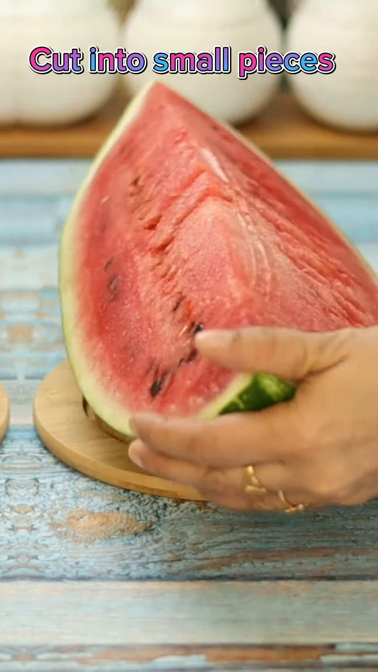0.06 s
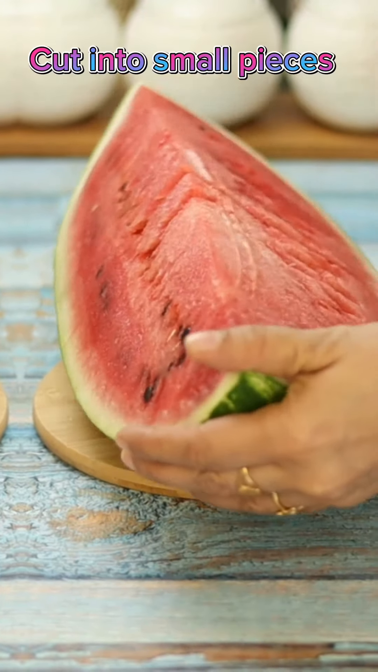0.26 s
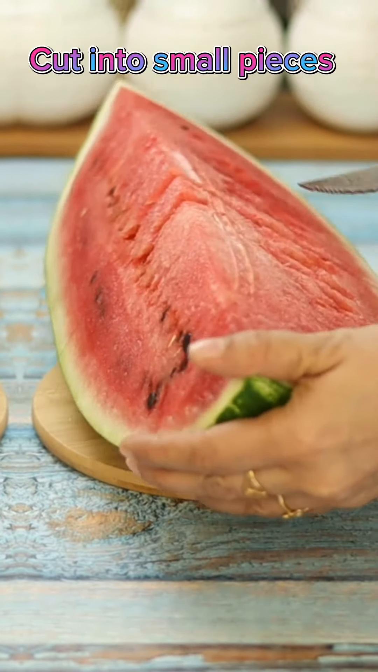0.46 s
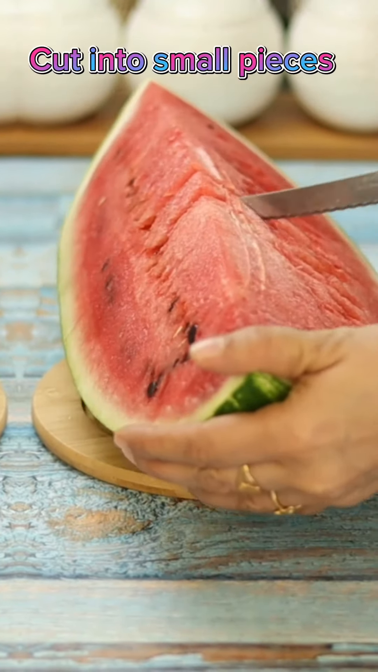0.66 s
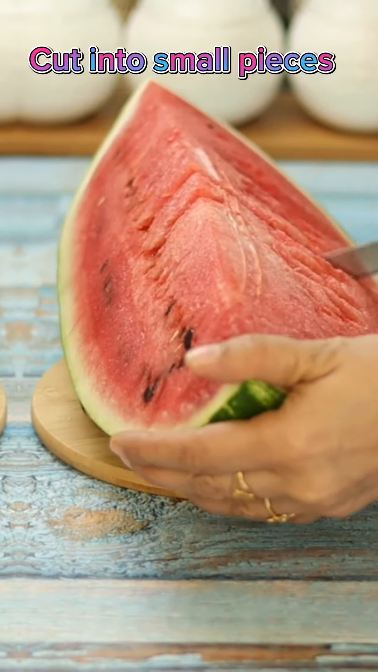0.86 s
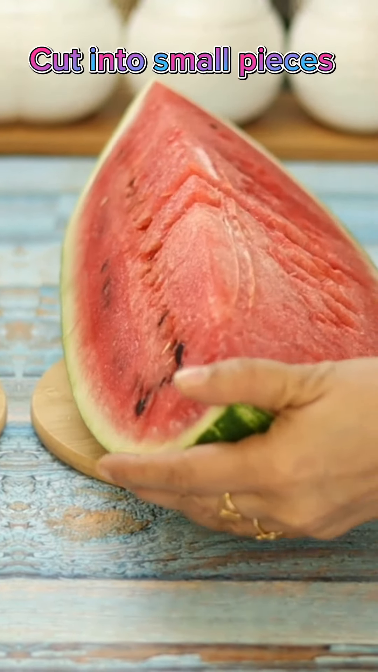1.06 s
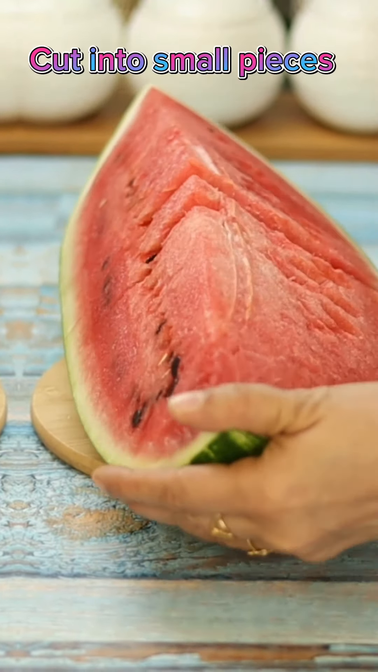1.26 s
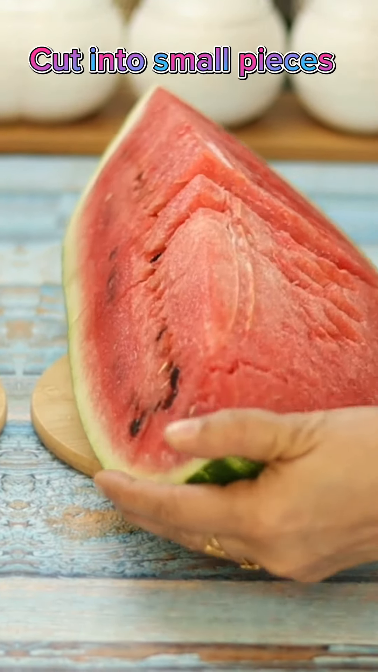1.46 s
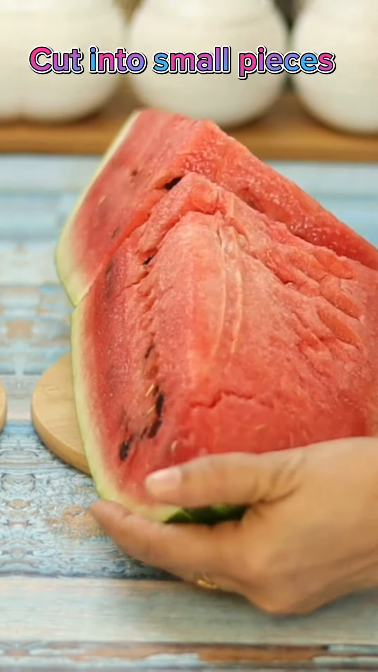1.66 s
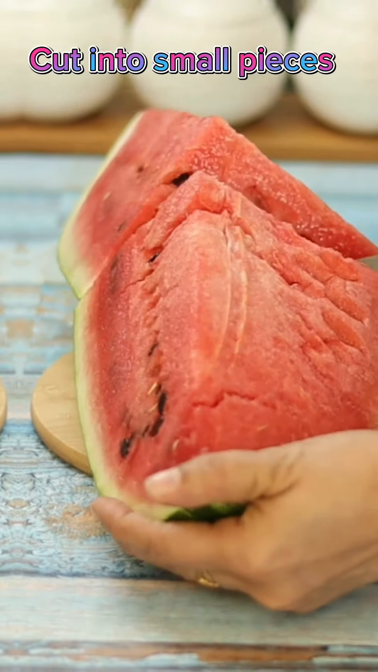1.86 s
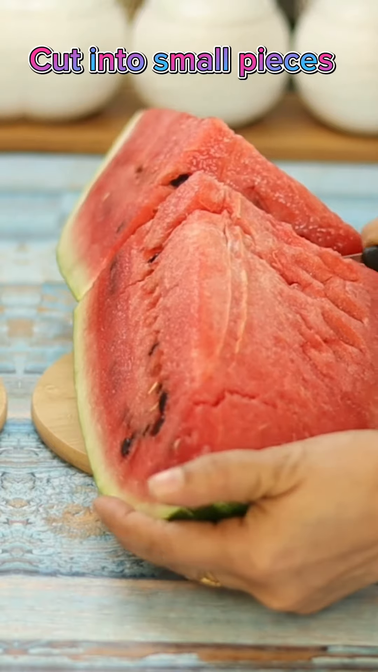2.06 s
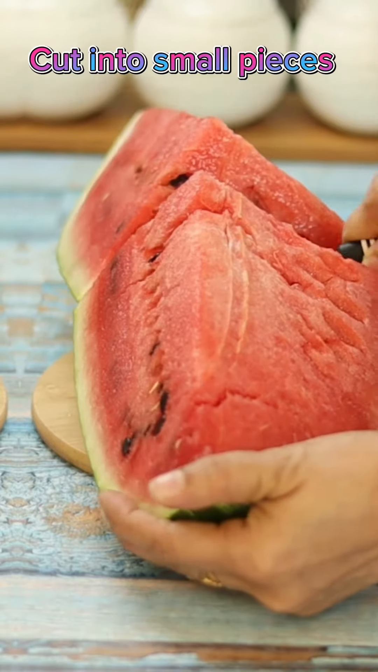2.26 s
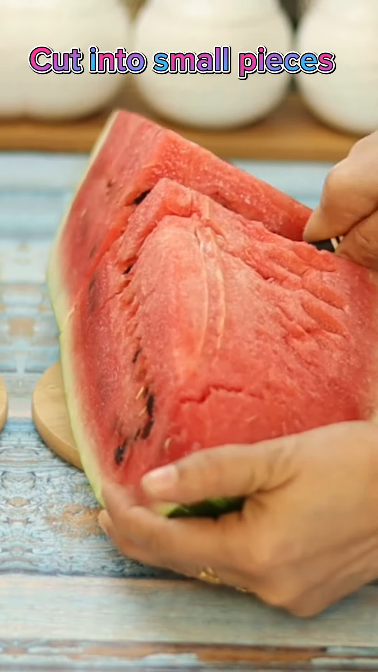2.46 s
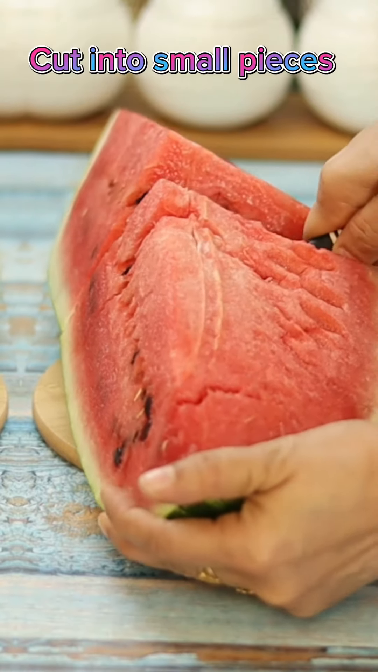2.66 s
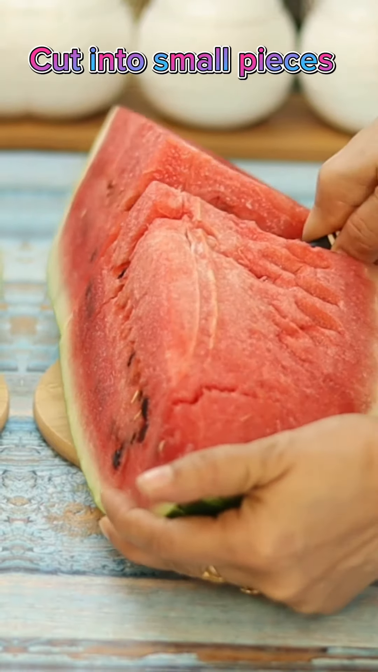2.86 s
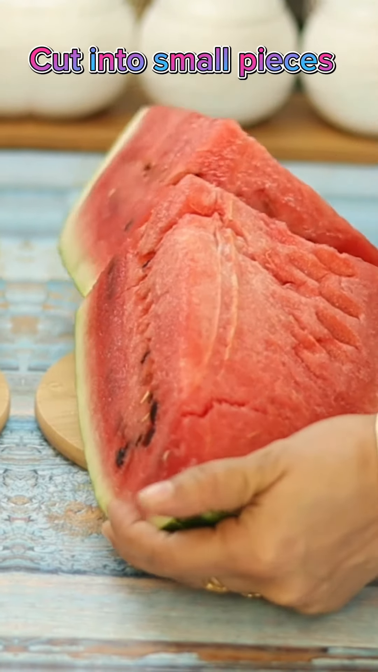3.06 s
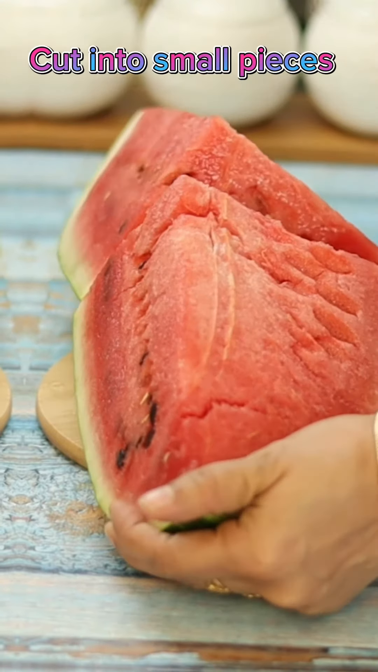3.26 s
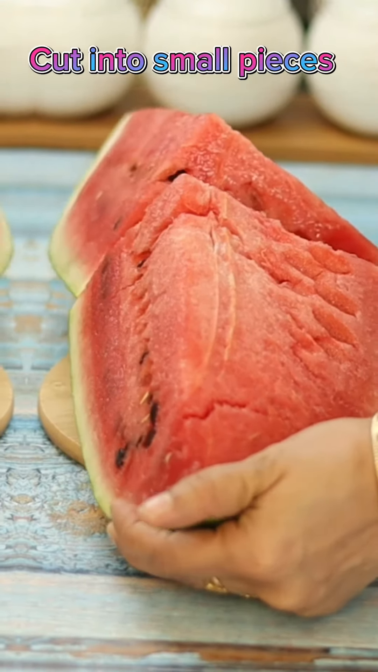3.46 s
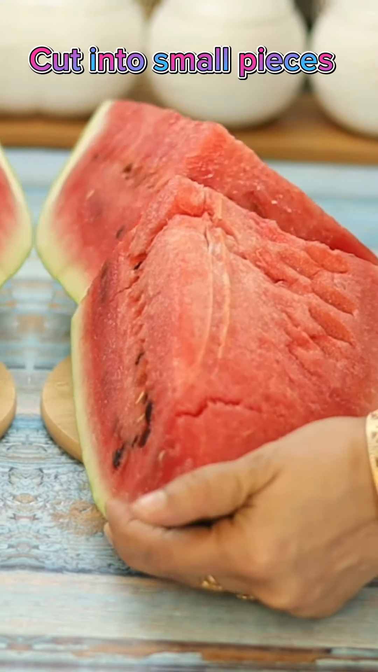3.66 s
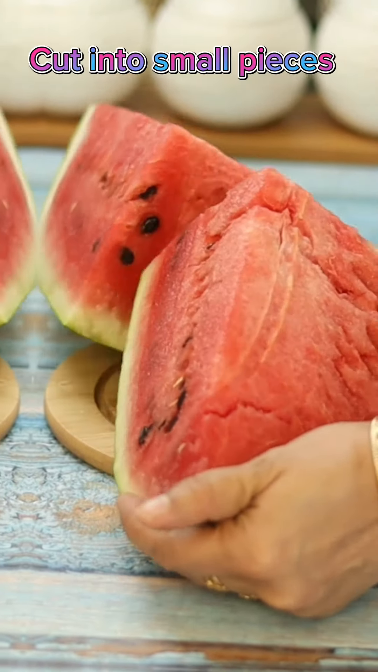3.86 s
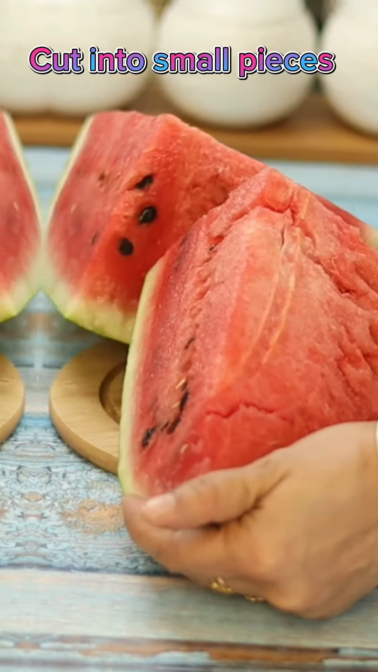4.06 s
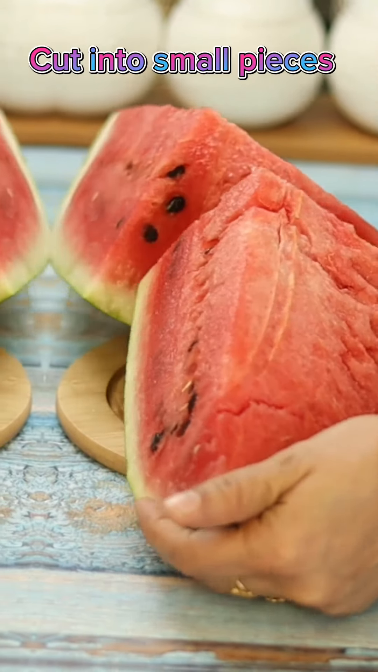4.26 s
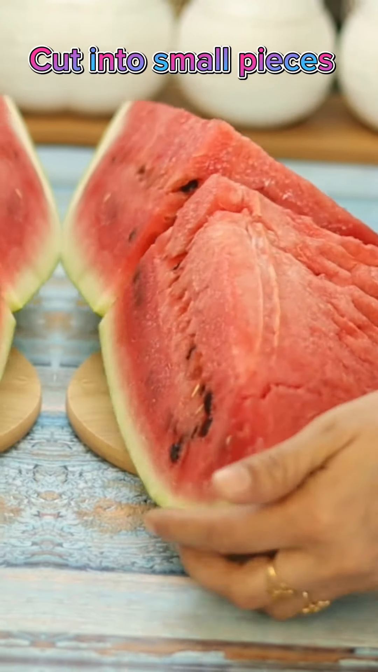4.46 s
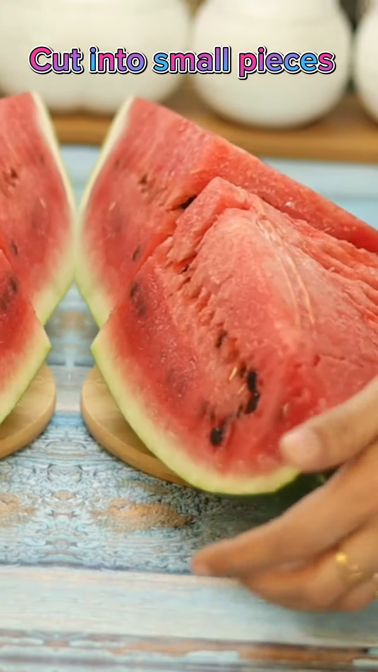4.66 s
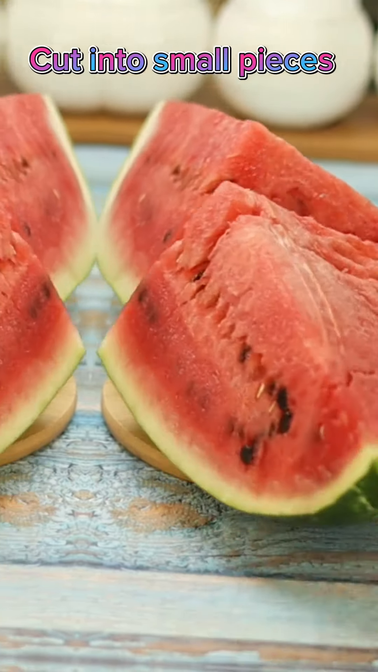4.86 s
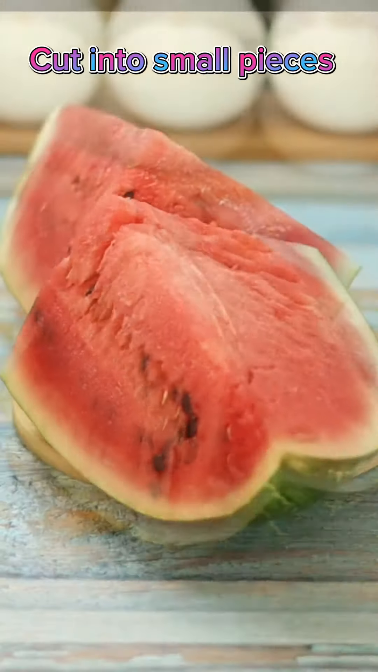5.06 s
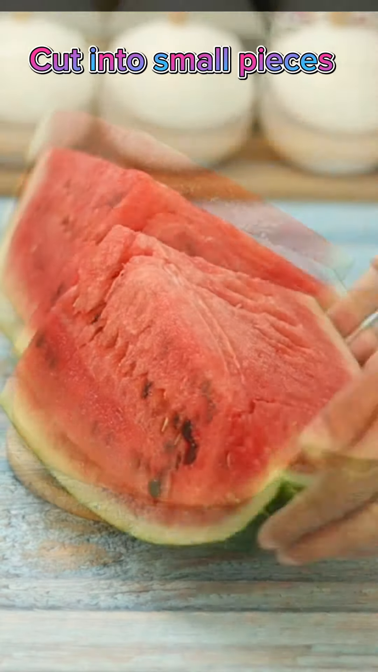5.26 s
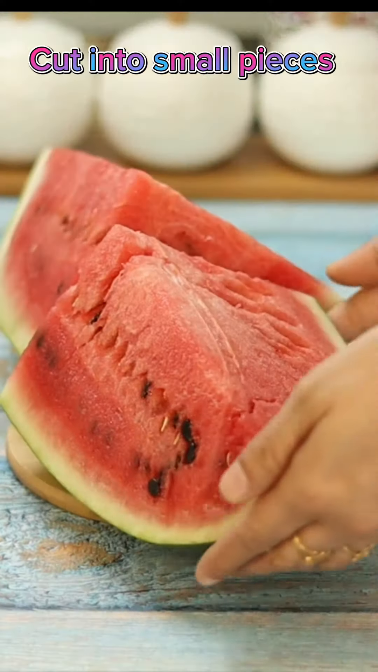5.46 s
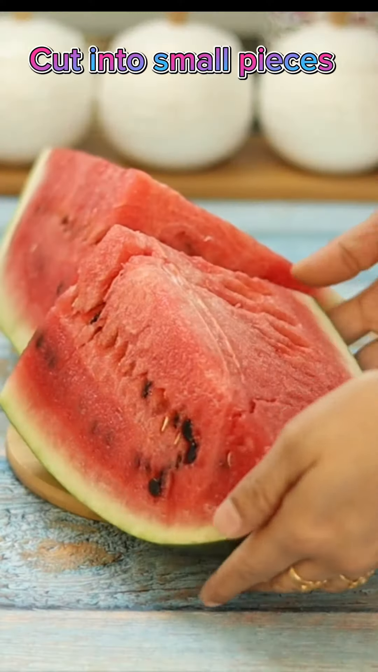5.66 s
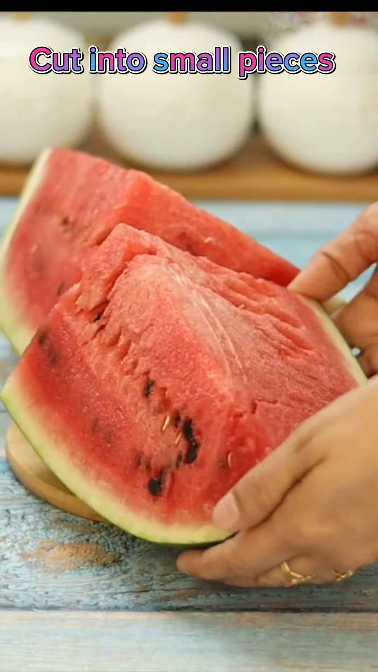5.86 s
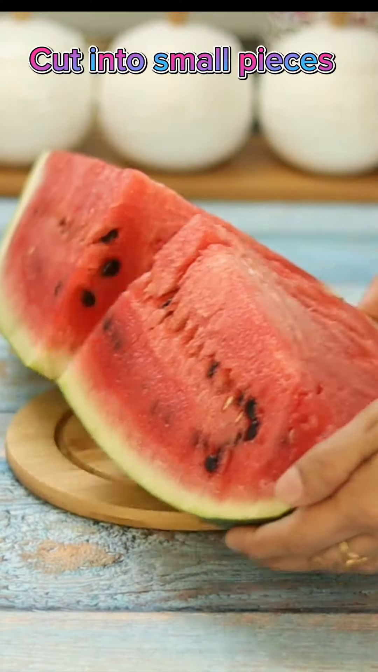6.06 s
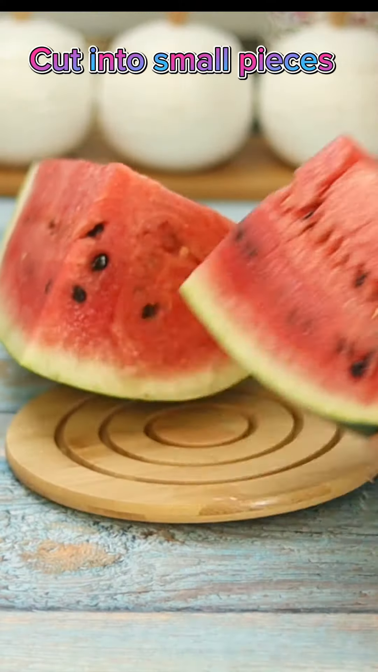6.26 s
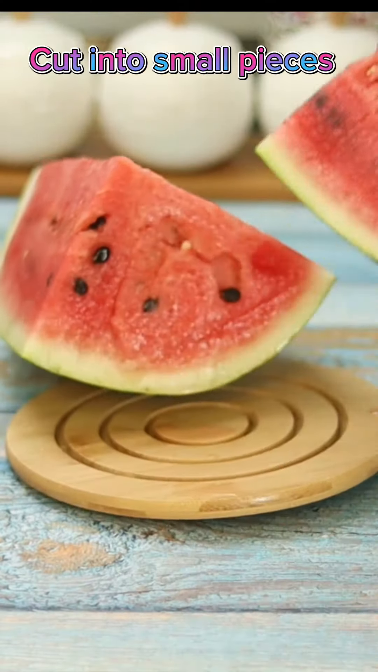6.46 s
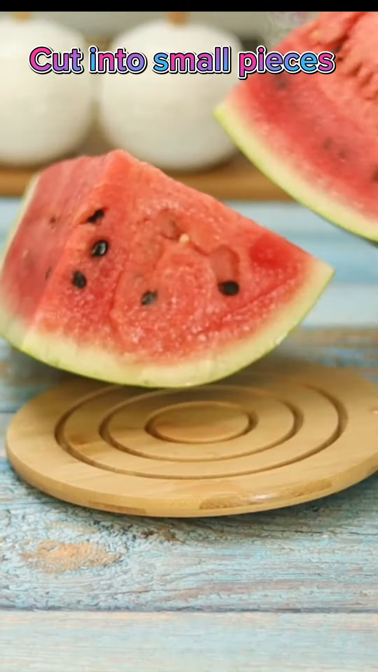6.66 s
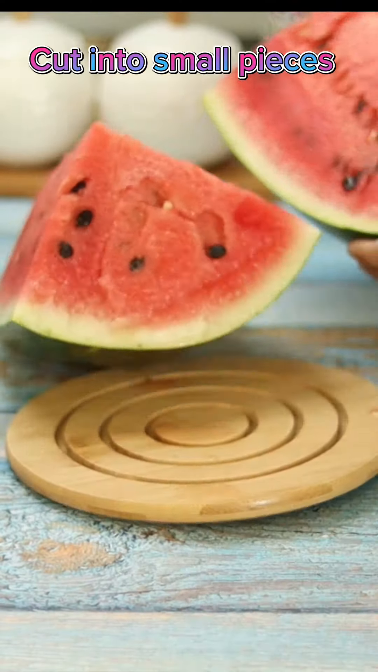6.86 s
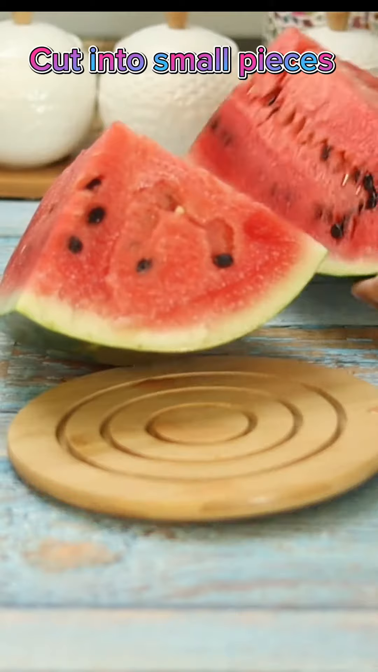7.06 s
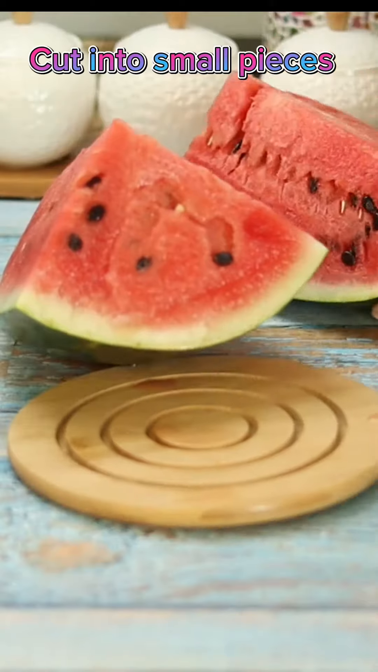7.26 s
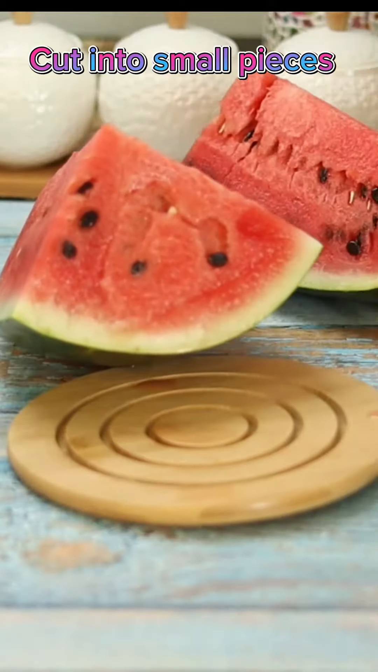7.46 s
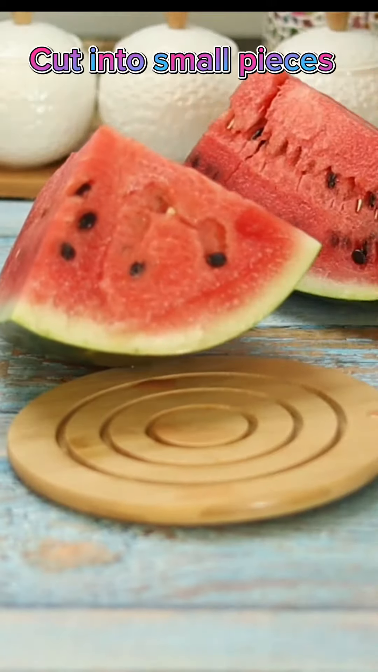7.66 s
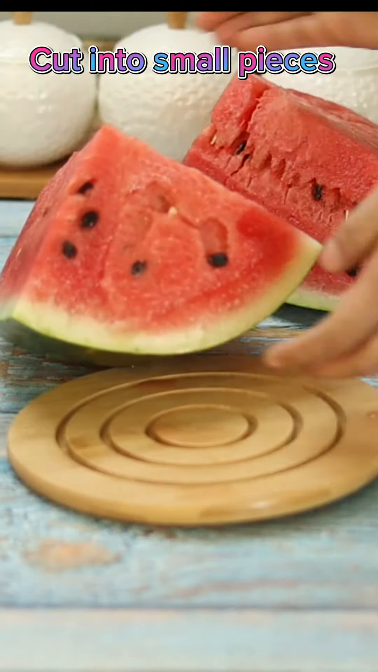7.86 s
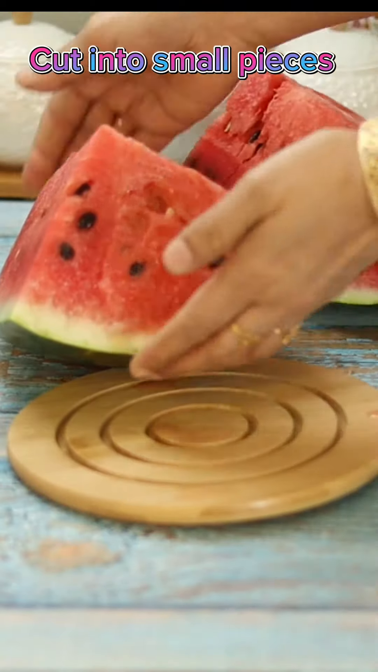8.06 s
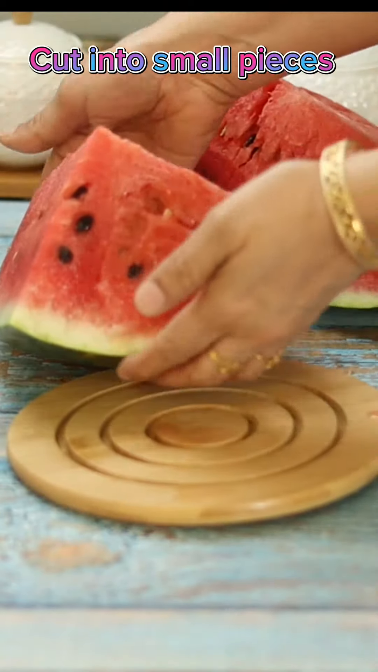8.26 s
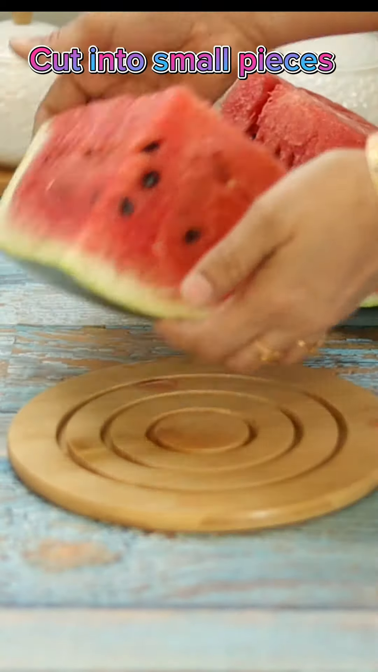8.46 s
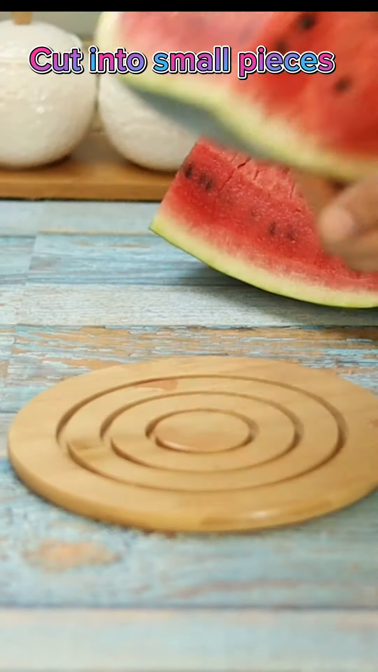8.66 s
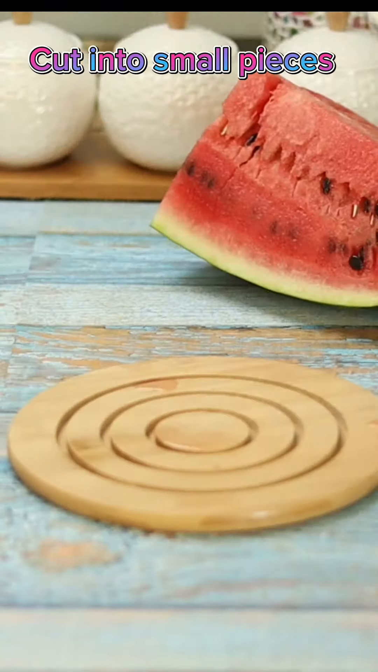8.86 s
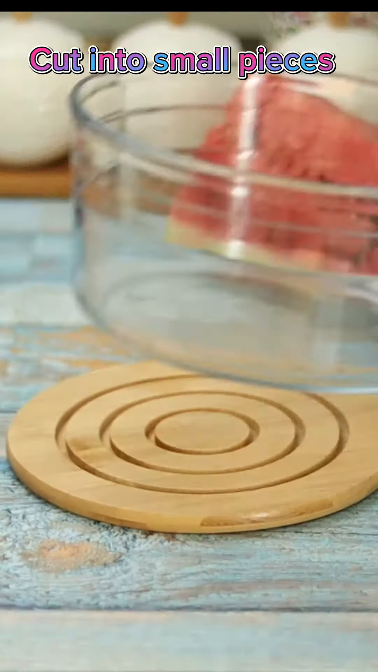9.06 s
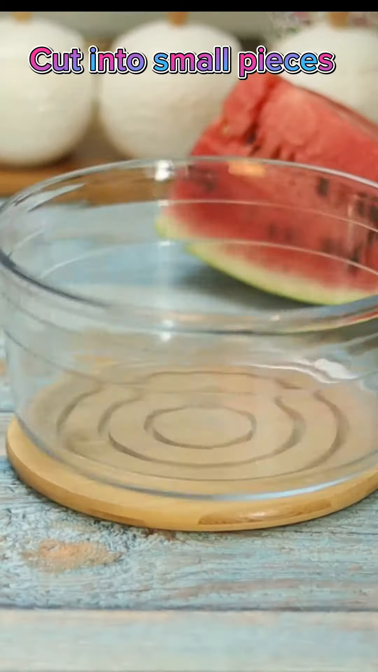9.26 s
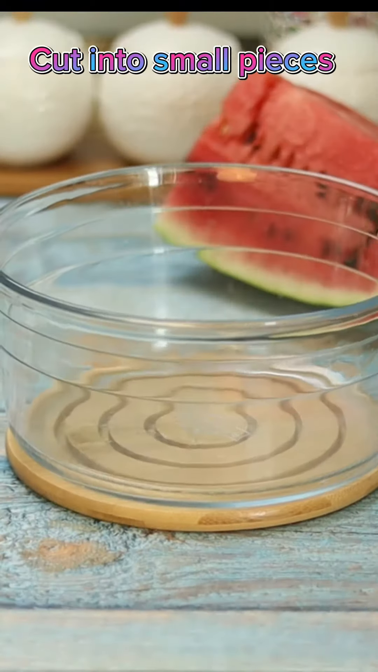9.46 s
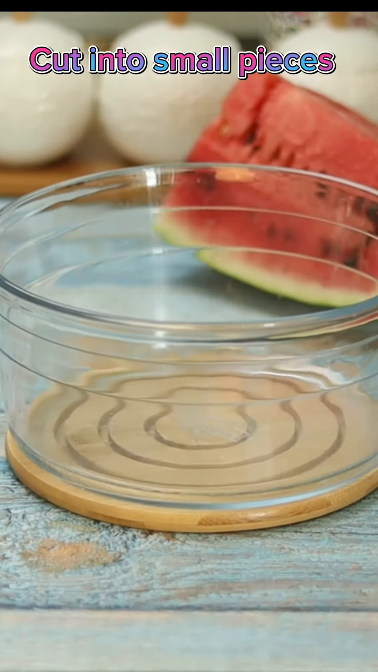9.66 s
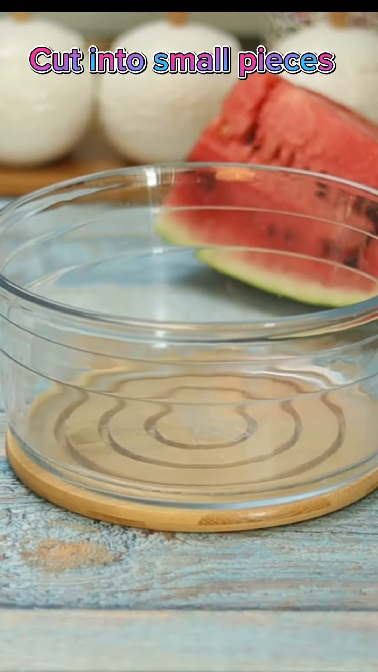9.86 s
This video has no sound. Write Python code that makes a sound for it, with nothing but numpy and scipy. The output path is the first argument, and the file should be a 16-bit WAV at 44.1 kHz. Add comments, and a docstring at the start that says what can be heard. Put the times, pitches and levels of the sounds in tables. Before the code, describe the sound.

A close microphone in a hard-walled kitchen, with a low 100-hertz appliance hum and airy rush from the start. Almost immediately, at 0.05 s, a very loud, wet crack splits the melon with a dull bump. Soft skin rubbing follows around 1 s, then a burst of crisp cracks and juicy crunches from 1.3 to 1.7 s. Quiet shifting and a brief low, rough judder come near 2.7 s, a short crack at 3.0, and a crunch with a hard blade-on-board knock at 3.8. Faint handling continues. At 5.4 s the hum cuts off, leaving fainter hum and room tone. Heavy pieces thud and scrape dully on wood at 7.0 and 7.25 s, with a softer bump at 8.4. A barely audible distant whistle glides upward around 8.6 to 9.2 s. At 9.27 s a thick glass bowl clunks onto the board, rattles briefly, and settles with a softer touch at 9.4.

```python
"""A knife splits a wedge of melon on a wooden board in a hard-walled kitchen: short rings make the rind's
cracks, clumped grains in broad resonances the crunch of flesh and the hands rubbing the skin. An appliance,
sines and coloured noise, hums from the start and falls silent midway; a fainter hum and room tone remain.
Pieces thud down and shift on damped wood modes; gliding sines make low rough judders, later a faint far
whistle. Near the end a glass bowl lands and rocks, in short modes. Echoes and a tail follow near sounds."""
import sys
import numpy as np
from scipy import signal
from scipy.fft import rfft, irfft
from scipy.io import wavfile
from scipy.ndimage import uniform_filter1d

SR = 44100
rng = np.random.default_rng(int(sys.argv[2]) if len(sys.argv) > 2 else 0)


def to_wav(sig):
    """Store sig (one row per channel, or 1-D mono) as 16-bit WAV at the path in sys.argv[1].

    Samples outside -1..1 are clipped; the rate is SR.
    """
    pcm = np.clip(np.atleast_2d(sig), -1, 1) * 32767
    pcm = np.round(pcm).astype(np.int16)
    wavfile.write(sys.argv[1], SR, pcm.T)  # frames by channels


def voltage_ratio(level):
    """Linear amplitude factor for a level in decibels (scalar or array-like)."""
    return 10 ** (np.asarray(level, float) / 20)


N = 437031
TIME = np.arange(N) / SR

# Rind cracks and small ticks; the rows at 0.051 and 3.783 s are strong early echoes of the cracks just before
# them. Each row: start in seconds, level in dB, pitch in Hz, snap against the ring in dB, left over right in
# dB.
CRACKS = [(0.044, 1, 1820, -26, 5.5), (0.046, -10, 3900, -24.5, 0), (0.051, -12.5, 1770, -12.5, -12),
          (0.364, -38, 1510, -2.5, -1.5), (0.731, -47.5, 1120, 3, 1), (0.931, -35, 3630, -20, -1.0),
          (0.959, -23, 1900, -13.5, -2.5), (1.107, -28.5, 2730, -26, -1.0), (1.264, -20.5, 2160, -12, -2.5),
          (1.307, -9, 3110, -23, -5.5), (1.329, -8.5, 2660, -13, -4), (1.365, -12.5, 1540, -13, 3),
          (1.496, -22, 3230, -5, -3), (1.501, -5.5, 2300, -26, -3), (1.537, -2.5, 2260, -25.5, -2.0),
          (1.571, -5, 2590, -18, -5), (1.694, -18.5, 3700, -1.5, 1), (3.009, -11, 1820, -16, -4.5),
          (3.667, -14, 2240, -12, -3), (3.74, -17, 2070, -11, 2), (3.776, -4, 1930, -3, -4.5),
          (3.783, -13.5, 1230, -11, 1), (4.446, -33.5, 5600, -33, 5), (4.636, -38.5, 3460, -14, -3),
          (6.132, -34.5, 2490, -2.5, -4.5), (6.98, -21.5, 1283, -21.5, -2), (7.259, -14.5, 1364, -23, -4),
          (7.3, -26, 2300, -18, -2), (7.46, -34.5, 2200, -30, -1), (7.515, -33.5, 2100, -31, 2),
          (7.558, -32.5, 2195, -31, -1.5), (7.844, -45.5, 1450, 3.5, 1), (8.591, -35, 1244, -23.5, -2),
          (9.109, -40, 2150, -17, 6)]
RING_T60_S, RING_DB_PER_DB = 0.0064, .1   # ring of a 0 dB crack; its lengthening with crack level

# Blade driven through flesh. Each row: start in seconds, hold in seconds, fall in seconds per 30 dB,
# flesh level in dB, brightness in dB per band.
CUTS = [(0.049, 0.0055, 0.0348, -13, -10.5), (0.097, 0.0054, 0.17, -30.5, -16.5),
        (1.111, 0.076, 0.17, -51, 0.5), (1.307, 0.041, 0.1237, -29.5, -3.5), (1.504, .085, 0.1141, -27, -3),
        (1.69, .005, 0.14, -38, 1), (3.011, 0.008, 0.0229, -26, -6.5), (3.04, 0.065, 0.2, -46, -0.5),
        (3.667, 0.085, 0.0446, -39.5, -2), (3.781, 0.0048, 0.03, -22.5, 0.5), (3.81, .01, 0.1747, -37, -3),
        (6.134, .003, .05, -48, -1.5), (6.982, .02, 0.3, -50, -9), (7.26, 0.014, .21, -32, -9),
        (8.389, 0.0039, 0.06, -61.5, -1)]
CUT_RISE_S_PER_30DB, CUT_FACE_DB = 0.0071, -2   # cut face against the even slope

# Hands and blade rubbing the skin. Each row: peak in seconds, rise and fall in seconds per 30 dB
# (1 ms at least), levels of flesh, cut face and juice in dB.
RUBS = [(0.037, 0.7, -0.0049, -30, -31.5, -32.5), (0.372, 0.6, 0.4, -61.5, -61, -63.5),
        (0.91, 0.7, .3, -59, -59.5, -54.5), (0.966, 0.13, 0.14, -37.5, -46.5, -50.5),
        (1.295, 0.37, 0.23, -47, -40, -48), (1.49, 0.13, 0.26, -45, -43.5, -57),
        (2.074, .1, 0.13, -55, -63.5, -60), (2.257, 0.22, 0.97, -60, -56.5, -55),
        (2.782, 0.1, 0.67, -62.5, -63, -62.5), (3.4, -0.4, 0.2, -62.5, -65, -65),
        (3.66, 0.08, -0.1, -55.5, -55, -51), (3.772, 0.1, -0.01, -35.5, -36, -37.5),
        (4.43, 0.7, 0.47, -69, -65, -60), (4.448, 0.07, 0.23, -68, -58, -53.5),
        (4.65, .05, 0.06, -69, -48, -65), (5.058, .4, 0.95, -57, -58, -57),
        (6.04, -0.15, 0.25, -67, -62.5, -85), (6.181, -0.5, 0.6, -72.5, -67.5, -65),
        (6.73, 0.7, 0.9, -67.5, -74, -69), (6.916, 0.4, -0.7, -71.5, -66.5, -70),
        (6.95, 0.05, 0.13, -55, -60.5, -53), (7.242, 0, 0.04, -45, -48, -50.5),
        (7.552, 0.1, 0.36, -56, -80, -74), (7.84, -0.6, 0.8, -72, -66, -68.5),
        (8.01, 0, 0.6, -62, -64.5, -63), (8.726, 0.24, 1.2, -74.5, -70.5, -65),
        (9.072, 1, 3.7, -64.5, -66, -77.5)]

# Resonances of flesh, cut face and juice, a list for each. Each row: pitch in Hz, width in Hz, level in dB.
FLESH_BANDS = [
    [(1170, 840, -0.5), (1550, 678, 5), (2450, 780, -2)],
    [(3110, 900, 3.5), (5100, 1850, 1)],
    [(6120, 1170, 2), (8600, 9100, -5), (11200, 2300, -0.5)],
]

# Blade knocks on the board and its early echo. Each row: start in seconds, level in dB.
BLADE_KNOCKS = [(3.7765, -10.5), (3.784, -11)]

# Knife and board modes. Each row: pitch in Hz, level in dB, t60 in seconds.
BLADE_MODES = [(1280, -2.5, 0.033), (1920, -7.5, 0.04), (2048, -9, 0.15), (2150, -8.5, 0.06),
               (3130, -9, 0.057), (4830, -6.5, 0.035), (5560, -14, 0.038), (7000, -10, 0.022)]

# Weights landing. Each row: start in seconds, push on table top, board and rind in dB.
THUDS = [(0.05, -41, -24, -37), (1.329, -56, -32, -31), (1.54, -62, -58, -52), (3.007, -49.5, -41, -50),
         (3.798, -27.5, -39.5, -41), (6.981, -21, -19.5, -26), (7.245, -16, -35.5, -39),
         (8.393, -24, -24, -34), (8.924, -54, -41, -47.5), (9.096, -50, -47.5, -55),
         (9.29, -43, -47.5, -33), (9.42, -31, -28.5, -22.5)]

# Pieces shoved and rocked on the wood. Each row: peak in seconds, rise and fall in seconds per 30 dB
# (1 ms at least), levels of table top, board and rind in dB.
SHOVES = [(0.028, -1, 0.24, -28.5, -38, -38), (0.051, -0.2, 0.13, -41, -26.5, -31.5),
          (1.354, 0.19, 0.22, -58, -39.5, -37.5), (1.404, 0.38, 0.03, -40, -43, -45),
          (1.515, 0.07, 0.36, -37.5, -34.5, -36.5), (1.7, 0, 0.25, -55, -57, -46),
          (2.844, 0, 0, -49, -54, -67), (3.016, 0.08, .2, -49, -35, -39), (3.232, 0.3, -0.8, -45, -51, -66),
          (3.744, 0.03, -0.5, -53, -48, -39), (3.784, 0.12, 0.19, -52, -29.5, -41),
          (3.824, 0.18, 0.29, -27.5, -34, -40), (5.75, 1.7, 1.5, -62, -61, -75),
          (6.326, 0.2, 0.3, -46, -50, -53), (6.72, -0.16, 0.5, -72.5, -48, -54.5),
          (6.948, 0, 0.6, -33, -52, -75), (6.993, 0.0234, 0.17, -27.5, -19, -28.5),
          (7.25, 0.07, 0.06, -21.5, -40, -50), (7.263, 0.0266, 0.03, -30, -35, -18.5),
          (7.291, 0.07, 0.35, -18, -33, -26.5), (8.396, -0.1, 0.23, -40, -30, -37),
          (8.5, 1.2, 0.33, -42.5, -48, -62), (9.12, -2.7, 0, -55, -53, -66),
          (9.274, -0.05, 0.58, -34.5, -40, -33.5), (9.436, 0.2, 0.2, -34, -28.5, -34),
          (9.55, -0.24, .5, -40.5, -45, -61)]

# Modes of table top, board and rind, a list for each. Each row: pitch in Hz, level in dB, t60 in seconds.
WOOD_MODES = [
    [(54.6, -33.5, 0.099), (75, -32, .2), (110.3, -4.5, 0.47), (143.4, -3, 0.18), (186, 1.5, 0.054)],
    [(246, 2.5, 0.039), (301.3, -1.5, 0.088), (379, -13, 0.064)],
    [(543, -7.5, 0.0045), (622, 3, 0.038), (708, 6, 0.017), (900, -15.5, 0.01), (1295, -11.5, 0.037)],
]

# Low rough judders, possibly rind under load; later a thin, faint far whistle gliding upward. Each row:
# start in seconds, length in seconds, first pitch in Hz, last pitch in Hz, level in dB.
GLIDES = [(2.66, .29, 195.7, 191.8, -45.5), (7.073, 0.037, 345, 387.5, -30), (8.639, .22, 1304, 1363, -65),
          (9.002, 0.17, 1364, 1450, -68)]
GLIDE_EDGE_S_PER_30DB = 0.039

# Bowl touches the board. Each row: start in seconds, level in dB.
BOWL_HITS = [(9.2702, -4), (9.273, -11.5), (9.2875, -5.5), (9.297, -15.5), (9.423, -18), (9.434, -21)]

# Bowl modes. Each row: pitch in Hz, level in dB, t60 in seconds.
BOWL_MODES = [(720, -14.5, 0.018), (1080, -2, 0.022), (1310, 1, 0.0091), (1784, 1, 0.015),
              (2170, -0.5, 0.018), (2640, 0.5, 0.02), (3200, -2.5, 0.013), (3440, -29.5, 0.59),
              (3680, -3.5, 0.018), (4330, -11.5, 0.011), (4748, -10, 0.0097), (5360, -17, 0.019),
              (6000, -14, 0.0072), (6880, -15, 0.015), (8600, -29, 0.011), (10300, -20, 0.0035)]
ROCK_START_S, ROCK_HOLD_S, ROCK_FALL_S_PER_30DB, ROCK_DB = 9.298, 0.11, 0.18, -25

# Table and wall echoes. Each row: delay in seconds, level in dB, left lag in samples.
ECHOES = [(.004, -15.5, 9), (.0077, -8, -7.5), (.012, -13, 7.5)]

# Reverberant tail, by octave. Each row: centre in Hz, t60 in seconds, relative level in dB.
TAIL = [(83, 0.97, -11.5), (173, 0.69, -3), (353, 0.34, -6.5), (700, 0.38, 3), (1310, 0.52, 3.5),
        (2778, 0.49, 2), (5600, 0.32, 8.5), (10900, 0.28, 7)]

# Diffuse sound. Each row: frequency in Hz, left-right likeness from -1 to 1.
LIKENESS = [(60, 1), (150, 0.67), (380, -0.19), (940, -0.31), (2350, -0.55), (5870, -0.73), (14700, -0.68)]

# Appliance hum. Each row: frequency in Hz, level in dB rms, phase in turns.
HUM = [(100.1, -52, 0), (150.2, -57, .25), (200.2, -47, 0), (250.2, -56, .25), (300.3, -50, 0),
       (350.3, -62, .25), (400.4, -57, 0), (490, -63, 0), (600.6, -64, 0), (900.9, -72, 0), (1082, -68, 0),
       (1130, -64, 0)]
HUM_OFF_S = 5.43

# Air of the appliance. Each row: frequency in Hz, relative density in dB.
AIR = [(15, -51.5), (25, -24.5), (93, -11), (146, -15), (191, -5), (250, -10.5), (301, -10), (450, -14),
       (1000, -19), (1120, -17.5), (1460, -23), (10900, -39), (15000, -85)]
AIR_DB = -51

# What still hums afterwards. Each row: frequency in Hz, level in dB rms, phase in turns.
FAR_HUM = [(100.6, -61, 0.016), (146.6, -56.5, 0.0025)]

# Room tone afterwards. Each row: frequency in Hz, relative density in dB.
QUIET = [(15, -42), (25, -34.5), (38, -8), (81, -9), (158, -8.5), (196, -9), (264, -9), (438, -12),
         (709, -14), (790, -14), (11200, -35.5), (13100, -31.5), (15000, -73)]
QUIET_DB = -52.5


def cracks():
    """Each crack is a click plus milliseconds of ragged tearing, in three short rings, and a bright snap."""
    out, size = np.zeros((2, N + SR)), 2048
    t, click = TIME[:size], np.eye(1, size)[0]
    white = rng.standard_normal((len(CRACKS), size))
    bright = signal.butter(2, [4000, 12000], "band", fs=SR, output="sos")
    hiss = signal.sosfilt(bright, white)
    for (s, db, hz, snap_db, pan_db), tearing, noise in zip(CRACKS, white, hiss):
        t60 = RING_T60_S * voltage_ratio(RING_DB_PER_DB * db)
        force = click + 0.06 * tearing * np.exp(-t / 0.0069)
        body = ring(force, hz, t60)
        body = body - 0.91 * ring(force, 1.47 * hz, 0.38 * t60)
        body = body - 0.53 * ring(force, .65 * hz, 0.64 * t60)
        snap = voltage_ratio(snap_db) * noise * np.exp(-t / 0.0037)
        at = round(s * SR)
        out[:, at:at + size] += voltage_ratio(db) * (body + snap) * left_right(pan_db)
    return out[:, :N]


def crunch():
    """Cells burst in dense clumps and sound in the flesh, at the cut face and in the juice."""
    strokes = []
    for s, hold, fall, db, bright in CUTS:
        levels_db = db, db + bright + CUT_FACE_DB, db + 2 * bright
        strokes.append((s, CUT_RISE_S_PER_30DB, hold, fall, *levels_db))
    strokes += [(s, rise, 0, *rest) for s, rise, *rest in RUBS]
    bursts = grains(4000, spread_db=3.6) * voltage_ratio(3.0 * drift(35))
    return sum(level * resonances(bursts, peaks) for level, peaks in zip(three_levels(strokes), FLESH_BANDS))


def blade_knocks():
    """Each row of the knock and its early echo sets the knife and board modes ringing."""
    return struck(BLADE_KNOCKS, BLADE_MODES, uneven_db=1.0)


def table():
    """Soft blows and dragging drive the same modes of table top, board and rind, each in its own measure."""
    out, at = 0, [round(row[0] * SR) for row in THUDS]
    drag = three_levels([(s, rise, 0, *rest) for s, rise, *rest in SHOVES])
    drag = uniform_filter1d(drag, size=200)   # weight shifts take some milliseconds
    for k, modes in enumerate(WOOD_MODES):
        blows = np.zeros(N)
        blows[at] = voltage_ratio(np.array(THUDS)[:, 1 + k])
        # a soft contact is a rounded push
        soft = signal.butter(2, [0.76 * modes[0][0], 2.23 * modes[-1][0]], "band", fs=SR, output="sos")
        blow, rub = signal.sosfilt(soft, [blows, grains(2000, spread_db=2.5)])
        thuds = sum(voltage_ratio(db) * ring(blow, hz, t60) for hz, db, t60 in modes)
        dragging = rms_one(sum(voltage_ratio(db) * ring(rub, hz, t60) for hz, db, t60 in modes))
        out = out + thuds + drag[k] * dragging
    return out


def judders_and_whistle():
    """Sines whose rate glides and jitters: rough when low, a thin whistle when high."""
    out = 0
    for s, length, from_hz, to_hz, db in GLIDES:
        rate_hz = np.interp(TIME, [s, s + length], [from_hz, to_hz]) + 9.0 * drift(39)
        tone = np.sqrt(2) * np.sin(2 * np.pi * np.cumsum(rate_hz) / SR)
        gain = voltage_ratio(db + 3.4 * drift(30)) * swell(s, GLIDE_EDGE_S_PER_30DB, length, GLIDE_EDGE_S_PER_30DB)
        out = out + gain * tone
    return out


def bowl():
    """Thick glass damped by the wood; while the base rocks and chatters, the board damps it harder."""
    chatter = 0
    for hz, db, t60 in BOWL_MODES:
        chatter = chatter + voltage_ratio(db) * ring(grains(1500, spread_db=2.0), hz, 0.46 * t60)
    rocking = voltage_ratio(ROCK_DB) * swell(ROCK_START_S, .01, ROCK_HOLD_S, ROCK_FALL_S_PER_30DB)
    return rocking * rms_one(chatter) + struck(BOWL_HITS, BOWL_MODES, uneven_db=0.0)


def kitchen(x, tail_db):
    """A few early echoes from either side, then a diffuse tail that decays at its own pace in each octave."""
    t, tail = TIME[:SR], 0
    for hz, t60, db in TAIL:
        octave = signal.butter(2, [hz / 2 ** .5, hz * 2 ** .5], "band", fs=SR, output="sos")
        band = signal.sosfilt(octave, rng.standard_normal((2, SR)))
        tail = tail + voltage_ratio(db - 60 * t / t60) * band
    response = voltage_ratio(tail_db) * spread(*tail) * np.clip(t / 0.0062, 0, 1)   # the tail builds up
    for delay_s, db, lag in ECHOES:
        response[[0, 1], [round(delay_s * SR + lag), round(delay_s * SR)]] += voltage_ratio(db)
    return signal.fftconvolve(x[None], response, axes=1)[:, :N]


def running():
    """Appliance gain: 1, then a 3.3 ms ramp down to 0 at HUM_OFF_S."""
    return np.clip((HUM_OFF_S - TIME) / 0.0033, 0, 1)


def appliance():
    """Hum lines and a rush of air until the appliance falls silent."""
    return running() * (tones(HUM, waver_db=1.3) + rush(AIR, AIR_DB, patchy_db=.6))


def quiet_room():
    """Fainter hum and room tone, heard once the appliance is silent."""
    return (1 - running()) * (tones(FAR_HUM, waver_db=3.0) + rush(QUIET, QUIET_DB, patchy_db=.7))


def tones(lines, waver_db):
    """Steady sines; each strength wavers a little."""
    out = 0
    for hz, db, turns in lines:
        strength = np.sqrt(2) * voltage_ratio(db + waver_db * drift(5.4))
        out = out + strength * np.cos(2 * np.pi * (hz * TIME + turns))
    return out


def rush(spectrum, level_db, patchy_db):
    """Diffuse coloured noise; the level counts from 500 Hz up."""
    hz = np.maximum(np.fft.rfftfreq(N, 1 / SR), 1)
    colour = voltage_ratio(at_hz(spectrum, hz))
    colour = colour / np.sqrt(np.sum(colour[hz > 500] ** 2) / len(hz))
    noise = irfft(colour * rfft(rng.standard_normal((2, N))), N)
    return voltage_ratio(level_db + patchy_db * drift(3)) * spread(*noise)


def spread(mid, side):
    """Two unrelated signals become left and right, alike in the bass and opposed in the treble."""
    hz = np.maximum(np.fft.rfftfreq(len(mid), 1 / SR), 1)
    alike = np.clip(at_hz(LIKENESS, hz), -.99, .99)
    common = np.sqrt((1 + alike) / 2) * rfft(mid)
    opposed = np.sqrt((1 - alike) / 2) * rfft(side) * [[1], [-1]]
    return irfft(common + opposed, len(mid))


def left_right(pan_db):
    """Gains that set left over right by pan_db."""
    return voltage_ratio(np.array([[pan_db / 2], [-pan_db / 2]]))


def struck(hits, modes, uneven_db):
    """Every touch strikes each mode with a random sign and, given uneven_db, a strength of its own."""
    at, peak_db = (np.array(hits)[:, 0] * SR).astype(int), np.array(hits)[:, 1]
    out = 0
    for (hz, db, t60), own in zip(modes, rng.standard_normal((len(at), len(modes))).T):
        clicks = np.zeros(N)
        clicks[at] = voltage_ratio(peak_db + db + uneven_db * np.abs(own)) * np.sign(own)
        out = out + ring(clicks, hz, t60)
    return out


def ring(clicks, hz, t60):
    """Two-pole resonator: a unit click sets a decaying sine of height 1 ringing."""
    r, w = voltage_ratio(-60 / (max(t60, .001) * SR)), 2 * np.pi * hz / SR
    return signal.lfilter([0, np.sin(w)], [1, -2 * r * np.cos(w), r * r], clicks + 1e-18)


def resonances(x, peaks):
    """Parallel broad resonances, signs alternating; rms 1."""
    out = 0
    for k, (hz, width, db) in enumerate(peaks):
        r = np.exp(-np.pi * width / SR)
        poles = [1, -2 * r * np.cos(2 * np.pi * hz / SR), r * r]
        out = out + (-1) ** k * voltage_ratio(db) * signal.lfilter([(1 - r * r) / 2, 0, (r * r - 1) / 2], poles, x)
    return rms_one(out)


def grains(per_s, spread_db):
    """Random clicks of uneven size and either sign."""
    sizes = voltage_ratio(spread_db * np.minimum(rng.exponential(1, N), 5)) * rng.choice([-1, 1], N)
    return sizes * (rng.random(N) < per_s / SR) + 1e-18


def three_levels(strokes):
    """Strokes (s, rise, hold, fall, three levels dB) summed for three parts, in steps of 8 samples."""
    shapes = np.array([swell(*row[:4])[::8] for row in strokes])
    return np.repeat(voltage_ratio(np.array(strokes)[:, 4:]).T @ shapes, 8, axis=1)[:, :N]


def swell(at_s, rise_s, hold_s, fall_s):
    """Gain that climbs 30 dB in rise_s to 1, holds, and sinks 30 dB in fall_s; 0 beyond 60 dB down."""
    out, rise_s, fall_s = np.zeros(N), max(rise_s, .001), max(fall_s, .001)
    near = slice(max(int((at_s - 2 * rise_s) * SR), 0), int((at_s + abs(hold_s) + 2 * fall_s) * SR))
    t = TIME[near] - at_s
    outside = np.maximum(-t / rise_s, (t - hold_s) / fall_s)
    out[near] = voltage_ratio(-30 * np.maximum(outside, 0))
    return out


def drift(rate):
    """Slow random curve through normal knots of spread 1, rate knots per second."""
    knots = rng.standard_normal(int(40 * N / SR) + 2)
    return np.interp(TIME * np.clip(rate, .1, 39), np.arange(len(knots)), knots)


def at_hz(points, hz):
    """Read a table on a log-frequency axis."""
    return np.interp(np.log(hz), np.log(np.array(points)[:, 0]), np.array(points)[:, 1])


def rms_one(x):
    """Scale to rms 1."""
    return x / np.sqrt(np.mean(x ** 2) + 1e-20)


def scene():
    """Near sounds and their room, over the hum and the room tone."""
    sharp = cracks() + blade_knocks() + crunch() * left_right(-1.4) + bowl() * left_right(-1.2)
    dull = table() + judders_and_whistle()
    # the table reaches the microphone mostly through the wood
    room = kitchen(sharp.mean(axis=0) + voltage_ratio(-10.5) * dull, tail_db=-34)
    return sharp + dull + room + appliance() + quiet_room()


def roll_off(x):
    """The treble ends steeply here."""
    return signal.sosfilt(signal.butter(12, 15270, fs=SR, output="sos"), x)


def record(dry):
    """The microphone drops the deepest bass and the top; the loudest peaks overload at full scale."""
    low_cut = signal.butter(4, 41, "high", fs=SR, output="sos")
    high_cut = signal.butter(2, 12500, fs=SR, output="sos")
    heard = signal.sosfilt(np.vstack([low_cut, high_cut]), dry)
    mix = np.clip(heard, -1, 1)
    return roll_off(mix)


dry = scene()
out = record(dry)
to_wav(out)
```